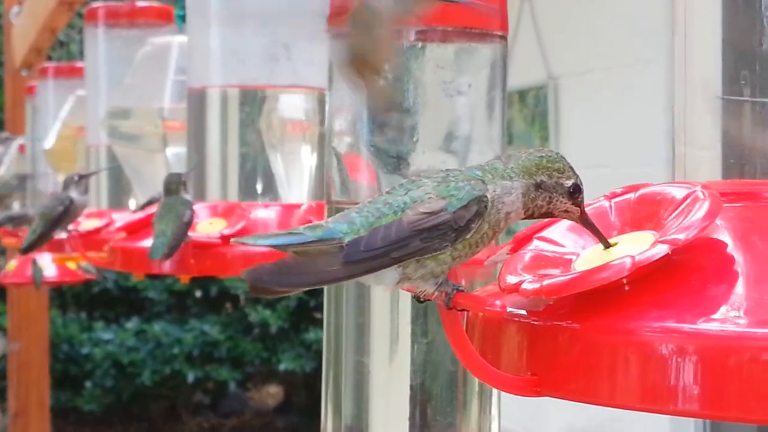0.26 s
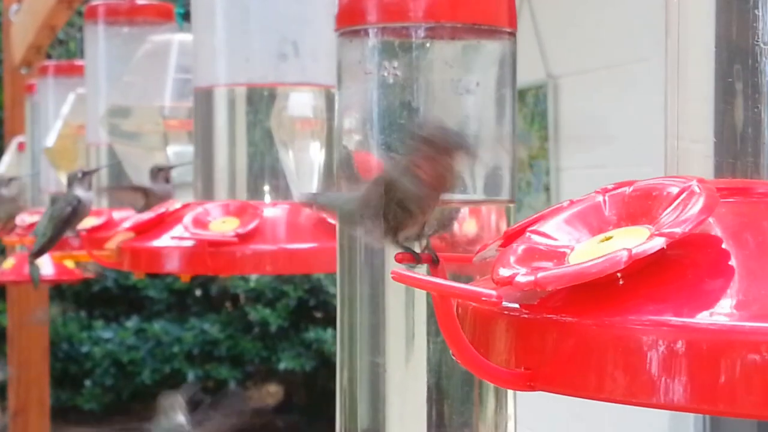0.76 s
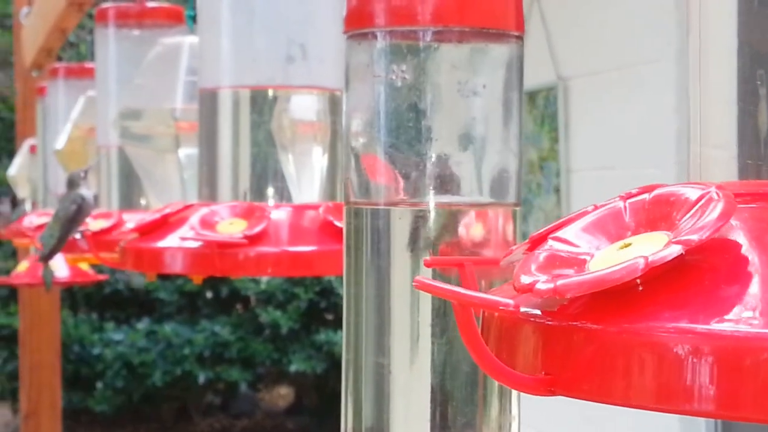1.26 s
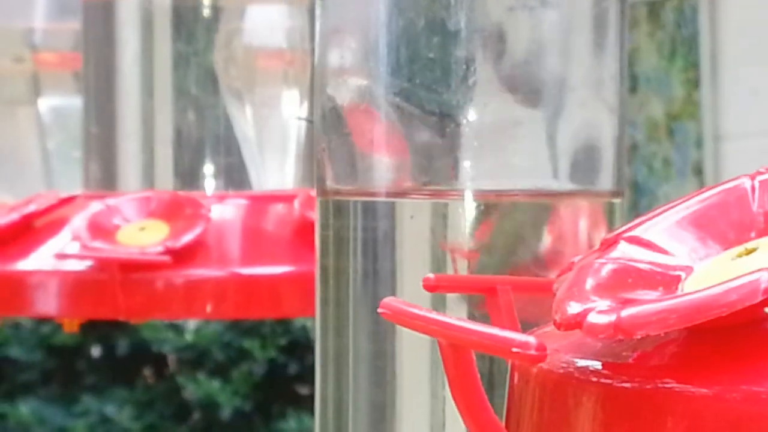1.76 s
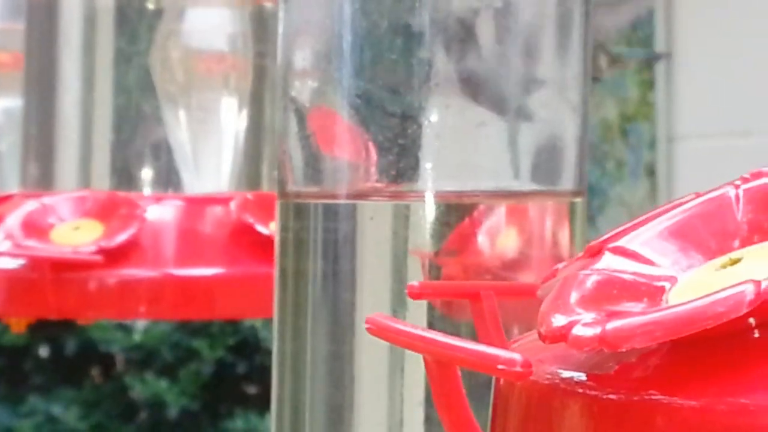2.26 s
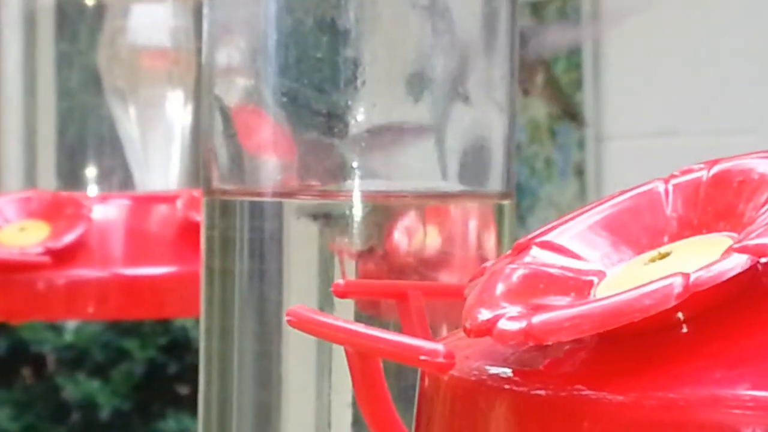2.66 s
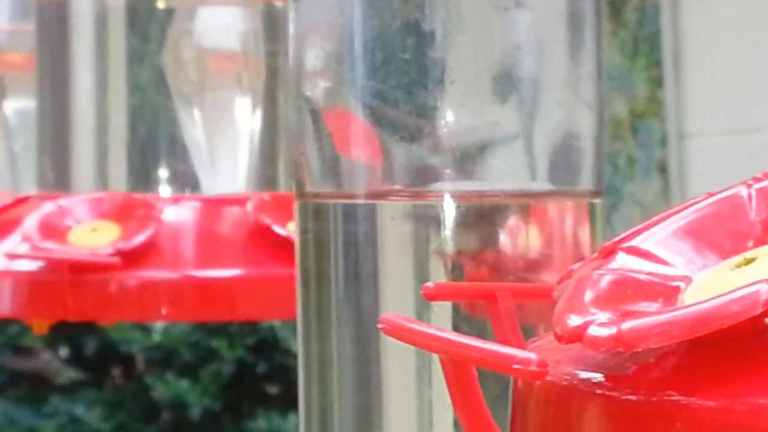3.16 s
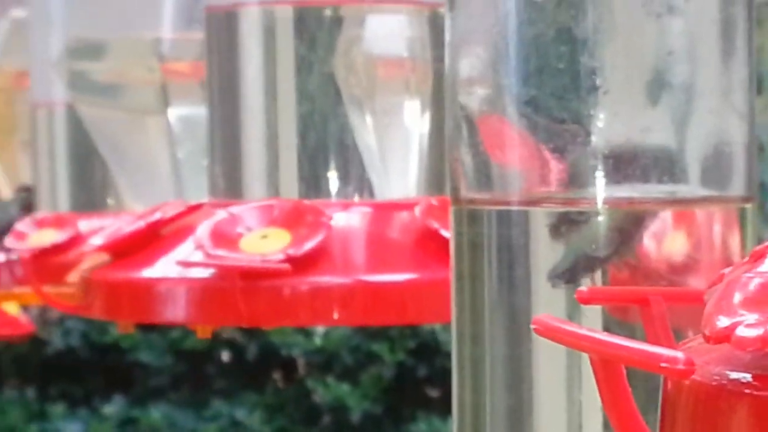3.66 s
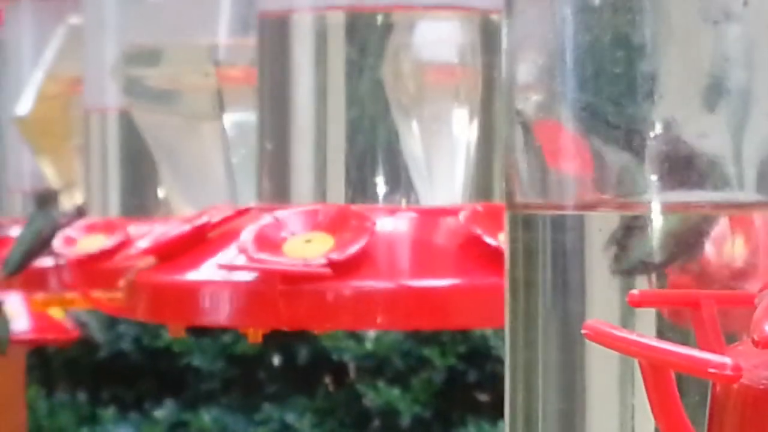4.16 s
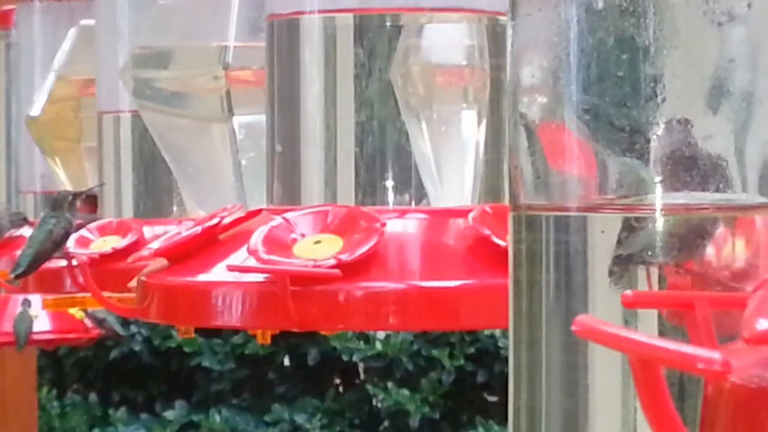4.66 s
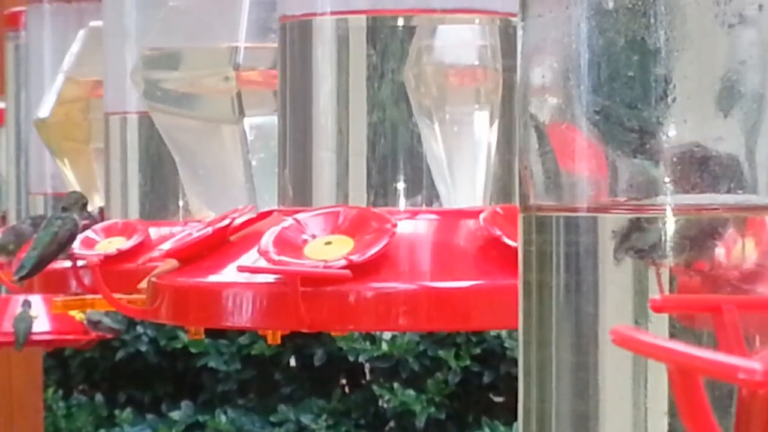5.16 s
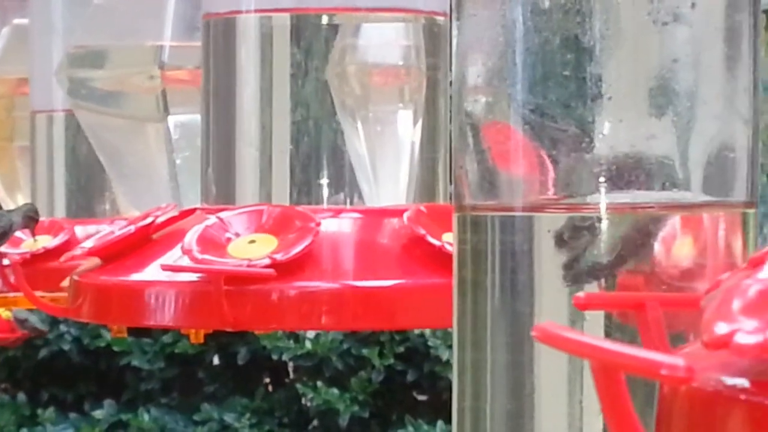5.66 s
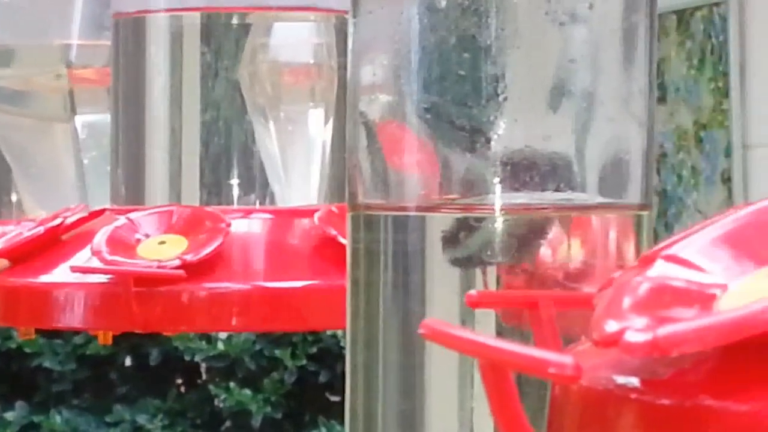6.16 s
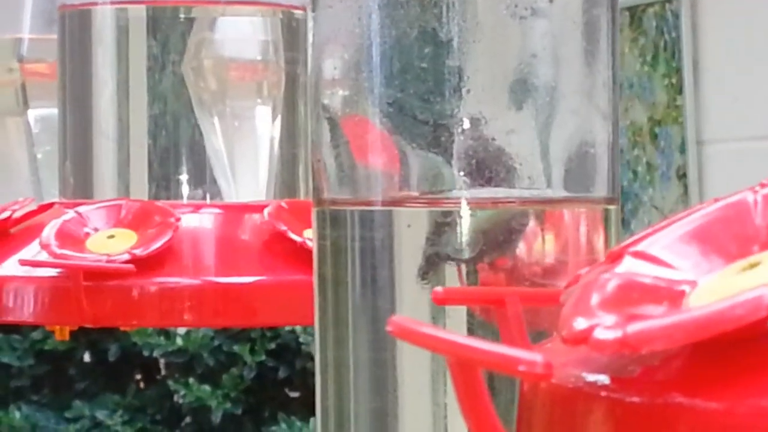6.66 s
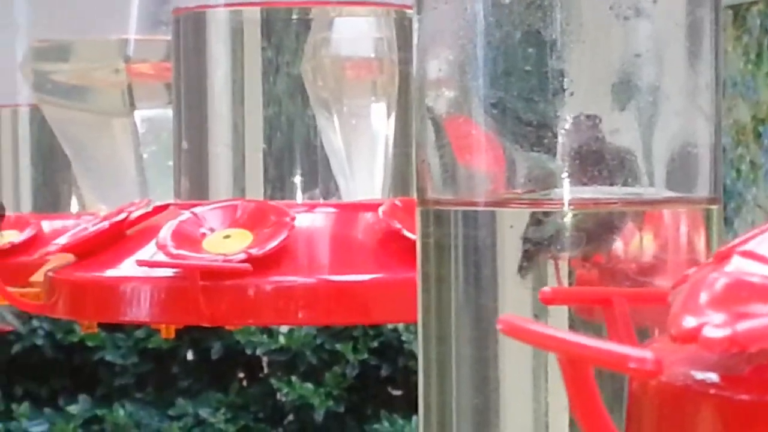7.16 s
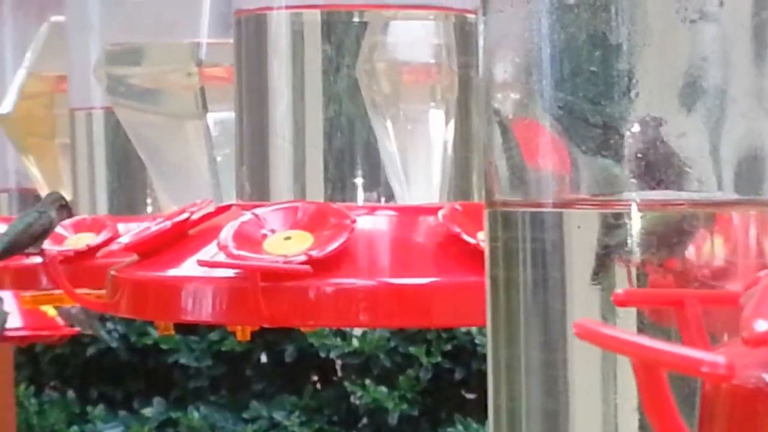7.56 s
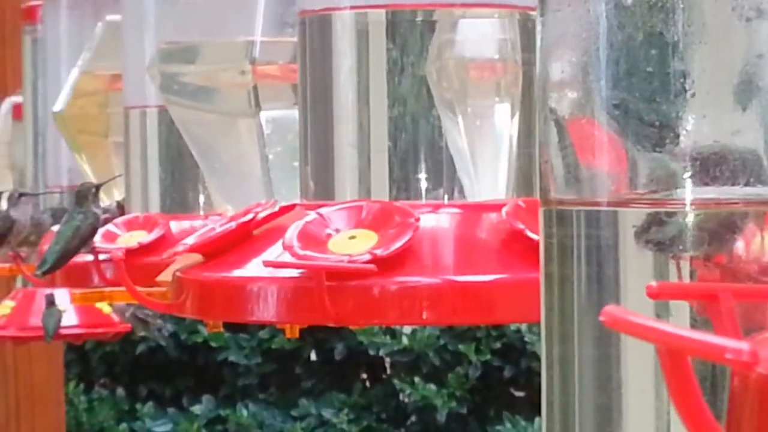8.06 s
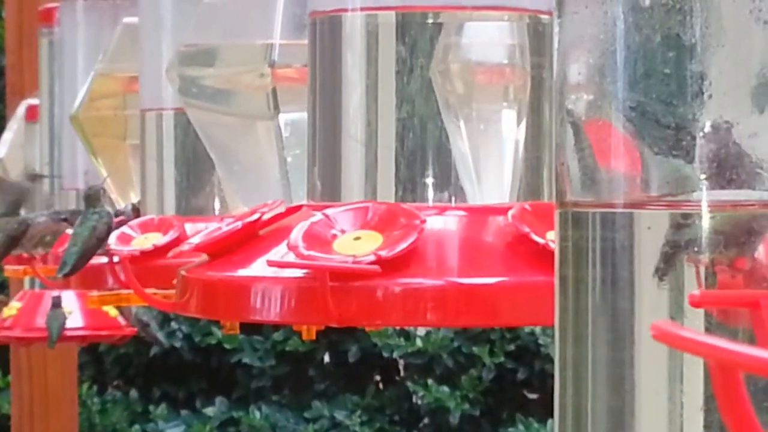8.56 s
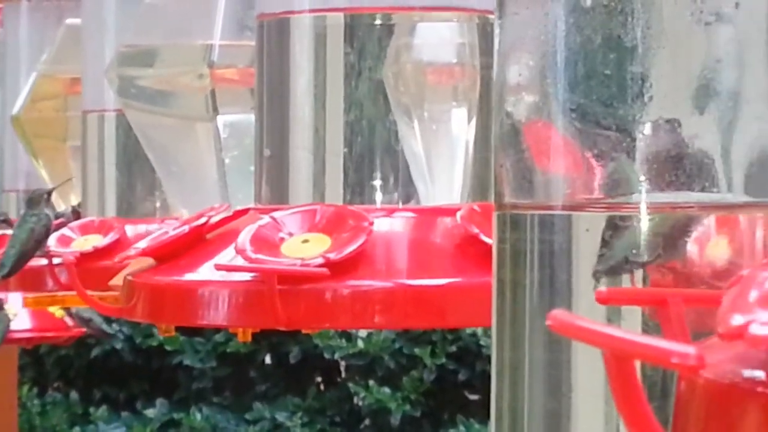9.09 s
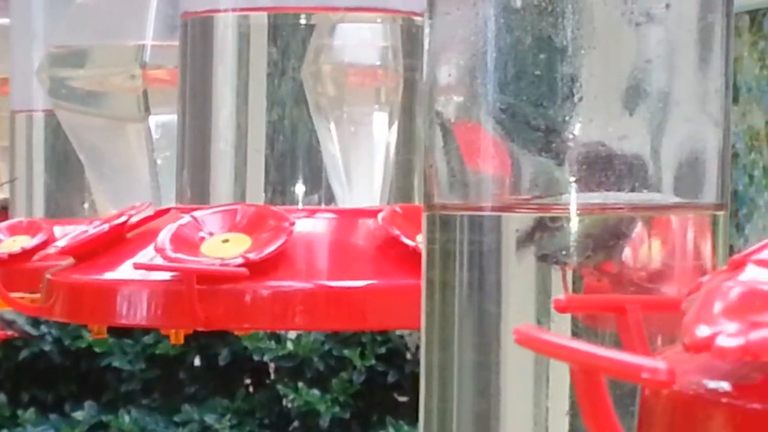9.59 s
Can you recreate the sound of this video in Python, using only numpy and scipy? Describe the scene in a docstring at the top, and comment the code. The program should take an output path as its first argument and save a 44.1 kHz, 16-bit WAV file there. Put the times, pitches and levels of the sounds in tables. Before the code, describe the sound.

Hummingbirds crowd nectar feeders, wings humming loudly at first, with sharp close chips, scolding chatter, thin squeals and late buzzy trills over distant twitter.

```python
"""Hummingbirds at the feeders

Hummingbirds crowd round plastic nectar feeders beside a house wall, close to the microphone.
Wings hum and whirr: shaped pressure pulses plus noise puffs, panned to and fro as the birds dart.
They squabble in falling chips, scolding notes, buzzy trills and thin squeals, made of gliding sines and rasp,
and now and then bump each other or a feeder: a decaying thump and a click of noise.
More birds twitter farther off: flickering noise and random chips, blurred by the yard's echo."""
import sys
import numpy as np
from scipy import signal
from scipy.fft import rfft, irfft, next_fast_len
from scipy.io import wavfile
from scipy.ndimage import map_coordinates

SR = 44100
rng = np.random.default_rng(int(sys.argv[2]) if len(sys.argv) > 2 else 0)


def to_wav(s):
    """Save 16-bit WAV."""
    ch = np.atleast_2d(s).T  # columns
    pcm = np.round(np.clip(ch, -1, 1) * 32767)  # PCM
    wavfile.write(sys.argv[1], SR, pcm.astype(np.int16))


N = 433503

# The deep body of the wing hum. Each row: frequency in Hz, relative level in dB.
HUM = [(25,-36), (44,-7.5), (62,-14.5), (92,-1.5), (190,-2.5), (380,-8.5), (1800,-42.5)]
# The bright hiss of feathers in air. Each row: frequency in Hz, relative level in dB.
SWISH = [(500, -12), (1050, 8.5), (1450, 4), (2200, 9.5), (6000, 2), (14000, -25)]
# The high band of massed calls, also the rasp in a voice. Each row: frequency in Hz, relative level in dB.
TWITTER = [(2500, -20.5), (4300, -5.5), (6200, -3.5), (7500, -1.5), (10000, -13), (14000, -18.5)]


def amp(db):
    """Decibels to gain."""
    return 10 ** (np.asarray(db) / 20)


def unit(x):
    """Scale to rms 1."""
    return x / np.sqrt(np.mean(x ** 2) + 1e-20)


def along(points, hz):
    """Read (Hz, value) points on a log frequency axis."""
    f, v = np.transpose(points)
    return np.interp(np.log(hz + 1), np.log(f), v)


def curve(points):
    """Draw (seconds, value) points as one value per sample."""
    s, value = np.transpose(points)
    return np.interp(np.arange(N) / SR, s, value)


def silence():
    """An empty stereo track."""
    return np.zeros((2, N))


def hiss(size=N):
    """White noise, unrelated left and right."""
    return rng.standard_normal((2, size))


def wobble(rate, size=N):
    """A smooth random curve, rate knots a second."""
    at = np.arange(size) * rate / SR
    knots = rng.standard_normal(int(size * rate / SR) + 4)
    return map_coordinates(knots, [at], order=2)


def phase_of(hz):
    """The running phase of a moving frequency, in radians."""
    return 2 * np.pi * np.cumsum(hz) / SR


def progress(length):
    """0 to 1 over a note of length seconds."""
    return np.linspace(0, 1, max(int(length * SR), 32))


def coloured(x, spectrum):
    """x shaped by a (Hz, dB) spectrum, at rms 1."""
    m = next_fast_len(N + 8192)
    gain = amp(along(spectrum, np.fft.rfftfreq(m, 1 / SR)))
    return unit(irfft(rfft(x, m) * gain, m)[..., :N])


def panned(x, pan_db):
    """Place a sound at constant power; pan_db is left over right, so negative is to the right."""
    g = amp(np.array([pan_db, -pan_db]) / 2).reshape(2, -1)
    return x * g / np.sqrt(np.mean(g ** 2, axis=0))


def add(out, s, x):
    """Mix x into out from time s in seconds."""
    i = int(np.clip(round(s * SR), 0, N - 1))
    out[:, i:i + x.shape[1]] += x[:, :N - i]


def wingbeat(beat_hz, wander, eddies, sharpness=40):
    """Two pressure pulses a beat, down and up, each shedding a puff of eddies; returns hum and stroke force."""
    phase = phase_of(beat_hz * (1 + wander * wobble(7)))
    down = np.abs(np.cos(phase / 2)) ** sharpness
    up = np.abs(np.sin(phase / 2)) ** sharpness
    stroke = down + 0.31 * up + 0.6
    puffs = coloured(stroke * rng.standard_normal(N), HUM)
    pulses = coloured(np.gradient(stroke), HUM)
    return unit(pulses + eddies * puffs), stroke


def wings(count=4, hum_gain_db=2.0, spread_db=6, air_db=-6, swish_db=-6, swish_pan_db=2):
    """Several birds, each at its own beat, dart nearer and farther and from side to side."""
    # The loudness of the wings over time. Each row: time in seconds, level in dB (the hum sits 2 dB over it).
    wing_level = [(0.3, -42), (0.68, -33.5), (1.29, -40), (2.71, -49.5), (4.27, -54), (4.87, -52.5),
                  (5.86, -52.5), (6.27, -60), (6.55, -52), (6.98, -58), (7.66, -56.5), (8.35, -44.5),
                  (8.8, -47.5), (9.1, -44), (9.83, -49)]
    birds, swish = silence(), silence()
    for beat_hz in np.linspace(40, 53, count):
        hum, stroke = wingbeat(beat_hz, wander=.06, eddies=1.488)
        nearness = amp(3.9 * wobble(12))
        birds += panned(hum * nearness, spread_db * wobble(1.957))
        swish += stroke * nearness * hiss()  # feathers hiss on every stroke
    stirred_air = coloured(hiss(), HUM)
    whirr = amp(hum_gain_db) * unit(unit(birds) + amp(air_db) * stirred_air)
    feathers = panned(amp(swish_db) * coloured(swish, SWISH), swish_pan_db)
    return amp(curve(wing_level)) * (whirr + feathers)


def syrinx(hz, overtone_db, count):
    """A tone on a moving pitch; each partial swells as it crosses the voice's resonances."""
    # The voice's resonances. Each row: frequency in Hz, gain in dB.
    voice = [(2050, -8), (2700, -22), (3300, -25), (5200, -4), (6500, -5.5), (7400, 5), (8400, -6),
             (9500, -16.5), (10500, -21), (13000, -16)]
    phase = phase_of(hz)
    tone = 0
    for k in range(1, count + 1):
        gain = amp(along(voice, k * hz) + overtone_db * (k - 2.0))
        audible = k * hz < SR / 2
        tone = tone + gain * audible * np.sin(k * phase)
    return tone


def chip(top_hz, length, end_hz=3100, bend=2.2):
    """One whistle that hangs at the top, then plunges and cracks, at peak 1."""
    u = progress(length)
    crack = .07 * u ** 2 * wobble(3000, len(u))
    hz = (top_hz + (end_hz - top_hz) * u ** bend) * (1 + crack)
    x = syrinx(hz, overtone_db=-7 + 12 * u, count=2)
    x = x * np.minimum(u / 0.19, 1) * np.minimum((1 - u) / 0.063, 1)  # fade in and out
    return x / np.abs(x).max()


def far_birds(count=160, scatter_db=2):
    """Chips at random times, levels, sides and pitches from the other feeders."""
    out = silence()
    times = rng.uniform(0, N / SR, count)
    for s, size, side, pitch in zip(times, *rng.standard_normal((3, count))):
        x = amp(scatter_db * size) * chip(8400 + 600 * pitch, 0.01)
        add(out, s, panned(x, 4 * side))
    return out


def yard(x, near_db=7, near_t60=0.13):
    """The feeders scatter a quick dense echo; wall and hedge add a tail that dies sooner in the treble."""
    # The tail of wall and hedge. Each row: frequency in Hz, time to fall 60 dB in seconds.
    decay_times = [(7000, 0.24), (14000, 0.0052)]
    hz, t, z = signal.stft(hiss(SR // 3), SR, nperseg=256)
    far_tail = amp(-60 * t / np.abs(along(decay_times, hz))[:, None])
    near_scatter = amp(near_db - 60 * t / near_t60)
    decay = (far_tail + near_scatter) * (t > 0)
    tail = signal.istft(z * decay, SR, nperseg=256)[1]
    tail = tail / np.linalg.norm(tail[0])
    return signal.fftconvolve(x.mean(axis=0)[None], tail, axes=1)[:, :N]


def twitter(calls_db=-4, pan_db=-3):
    """Distant calls, mostly echo, blur into a high flickering wash."""
    # The loudness of the distant twitter over time. Each row: time in seconds, level in dB.
    twitter_level = [(0.0, -36), (0.35, -38), (0.9, -36.5), (2.6, -43.5), (3.7, -43.5), (4.11, -50),
                     (4.2, -45), (4.51, -53.5), (4.6, -43), (5.0, -49), (5.3, -43), (6.17, -46),
                     (6.3, -56.5), (6.55, -47), (6.7, -58), (7.58, -50), (7.85, -41.5), (8.53, -48),
                     (9.06, -40), (9.83, -40.5)]
    far = far_birds()
    flutter_db = 2.2 * wobble(20) + 2.6 * wobble(90)
    blur = coloured(hiss(), TWITTER) * amp(flutter_db)
    calls = amp(calls_db) * unit(far / 2 + yard(far))
    return panned((blur + calls) * amp(curve(twitter_level)), pan_db)


def trills(pulse_hz=370, sag=0.14, deepen=0.52, pan_db=-15):
    """A whistle breaks into tiny uneven down-sweeps, forced ones plunging deepest, and ends in a rasping dive."""
    # Buzzy trills. Each row: start in seconds, length in seconds, level in dB, top pitch in Hz.
    buzzes = [(0.047,0.06,-31,8620), (8.832,0.079,-30.5,9700), (8.948,0.028,-30.5,8900),
              (9.025,0.079,-26,9750), (9.135,0.046,-30,8700), (9.21,0.081,-26,9700), (9.345,0.075,-28,9550),
              (9.473,0.081,-31,9450), (9.605,0.073,-26,9550), (9.74,0.067,-26,9450)]
    out = silence()
    for s, length, db, top_hz in buzzes:
        u = progress(length)
        beats = np.cumsum(pulse_hz * amp(3 * wobble(200, len(u)))) / SR
        cycle = beats % 1
        broken = np.clip(6 * u - .7, 0, 1)  # 0 a plain whistle, 1 fully pulsed
        uneven = rng.standard_normal(len(u))[beats.astype(int)]  # one draw a pulse
        force = amp(3.5 * broken * uneven + 4 * u ** 4)
        plunge = deepen * broken * np.tanh(force ** 2 / 2) * cycle ** 1.5
        ragged = .02 * wobble(120, len(u)) + .028 * broken * u * wobble(2500, len(u))
        phase = phase_of(top_hz * (1 - sag * u ** 6 - plunge + ragged))
        pulses = np.abs(np.sin(np.pi * cycle ** .7)) ** (2 * broken) * force * (1 + broken)
        rasp = .17 * u ** 2 * rng.standard_normal(len(u))
        tone = np.sin(phase) + plunge ** 2 * np.sin(2 * phase)
        x = (tone + rasp) * pulses * signal.windows.tukey(len(u), .12)
        add(out, s, panned(amp(db) * unit(x), pan_db))
    return out


def scold(start_hz, hoarseness, rasp, cycles=46, sag=0.35, grit_db=0):
    """A note that holds, then drops through the voice's resonances; hoarse ones are longer and grittier."""
    length = cycles * (1 + hoarseness) / start_hz * amp(rng.normal(0, 1.59))
    u = progress(length)
    hoarse = .07 * hoarseness * wobble(1500, len(u))
    drop = sag * rng.uniform(.75, 1.25) * u ** 2.7
    hz = start_hz * amp(rng.normal(0, .25)) * (1 - drop + hoarse)
    grit = unit(rasp[:len(u)] * np.cos(phase_of(hz) / 2) ** 2)  # rasp pulsing at the pitch
    force = amp(2 * wobble(250, len(u))) * np.sin(np.pi * u ** 1.4)
    tone = unit(syrinx(hz, overtone_db=-0.5, count=5))
    return amp(rng.normal(0, 1)) * unit((tone + amp(grit_db) * hoarseness * grit) * force)


def scolds(pan_db=-9):
    """Runs of chatter from the perches; each run keeps an even pace and nearly one pitch."""
    # Runs of scolding. Each row: first note in seconds, last note in seconds, number of notes,
    # level in dB, starting pitch in Hz, hoarseness from 0 to 1.
    runs = [(0.171, .172, 1, -45, 2195, 0.1), (2.118, 2.117, 1, -32, 3160, 0.5),
            (2.203, 2.657, 8, -34, 3117, 0.22), (3.108, 3.294, 4, -35, 2640, 0.08),
            (3.469, 3.653, 4, -34, 2690, 0.05), (3.734, 4.013, 3, -37, 2680, 0.55),
            (4.158, 4.158, 1, -40.5, 2365, 0.44), (5.895, 6.1, 3, -40, 2190, 0.37),
            (6.52, 6.625, 3, -47, 2180, 0.3), (6.918, 7.022, 2, -46.5, 2150, 0.3),
            (7.403, 7.62, 2, -42, 2310, 0.4), (7.93, 8.024, 2, -33.5, 2664, 0.5),
            (8.108, 8.265, 4, -33, 2790, 0), (8.325, 8.394, 2, -32.5, 2630, 0.16),
            (8.51, 8.51, 1, -54, 2180, .15)]
    out = silence()
    rasp = coloured(rng.standard_normal(N), TWITTER)
    for first, last, notes, db, pitch_hz, hoarseness in runs:
        for s in np.linspace(first, last, int(round(notes))):
            note = scold(pitch_hz, hoarseness, rasp[int(s * SR):])
            add(out, s, panned(amp(db) * note, pan_db))
    return out


def chips(pan_db=-13):
    """The loudest birds snap close by on the right; fainter ones are nearer the middle."""
    # Sharp chips. Each row: time of the loudest part in seconds, level in dB, starting pitch in Hz,
    # length in seconds.
    snaps = [(0.26,-14,8330,0.0071), (0.339,-4.5,9170,0.0083), (0.901,-4.5,7520,0.011),
             (0.928,1,12440,0.0091), (1.025,-5.5,8850,0.0033), (1.259,-2.5,9100,0.0015),
             (1.331,-8.5,9600,0.015), (1.4,-2.5,9280,0.0092), (1.698,-6,9220,0.019),
             (1.803,-3.5,9070,0.0119), (2.811,-4.5,8880,0.012), (2.873,-5.5,9330,0.015),
             (2.973,-6,9040,0.012), (3.39,-4.5,7700,0.01325), (3.926,-4.5,7600,0.011),
             (4.569,-24.5,8400,0.0066), (4.744,-18.5,8370,0.0083), (5.613,-6,8100,0.013),
             (5.869,-20.5,8500,0.007), (6.154,-17,9150,0.0066), (7.09,-20.5,8226,0.014),
             (7.471,-21.5,8100,0.0096), (8.239,-18,8020,.01), (8.363,-17.5,9170,0.00763),
             (8.666,-17.5,8400,0.00503), (8.847,-18.5,9900,0.025), (9.221,-12.5,9400,0.0093),
             (9.492,-9,9450,0.023), (9.524,-11.5,9180,0.015), (9.778,-13,9200,0.0069)]
    out = silence()
    for s, db, top_hz, length in snaps:
        x = chip(top_hz, length)
        loudest = np.average(np.arange(len(x)), weights=x ** 4) / SR
        add(out, s - loudest, panned(amp(db) * x, pan_db - (db + 19)))
    return out


def squeals(overtone_db=-14, rasp_db=4.0, flutter_db=4.0, rise=.2, pan_db=-3):
    """Thin, arching notes; forced harder, they climb and break up into a ragged, fluttering rasp."""
    # Held squeals. Each row: start in seconds, length in seconds, level in dB, central pitch in Hz,
    # roughness from 0 (pure) to a little over 1 (torn).
    cries = [(0.344,0.15,-31.5,4250,1.13), (0.619,0.1383,-29.5,4280,0.92), (0.908,0.1,-29,4310,1.01),
             (1.935,0.12,-33.5,7320,0.54), (2.803,0.24,-40,6510,0.62), (7.689,0.07,-33.5,6120,0.49),
             (7.763,0.12,-36.5,6060,0.45), (8.545,0.078,-37.5,5145,0.24), (8.605,0.13,-39.5,5402,0.8)]
    out = silence()
    rasp = coloured(hiss(), TWITTER)
    for s, length, db, pitch_hz, rough in cries:
        u = progress(length)
        waver = .07 * rough ** 2 * (wobble(130, len(u)) + wobble(1500, len(u)))
        arch = .06 * rough * (np.sin(np.pi * u) - .7)
        climb = rise * rough ** 2 * (u - u.mean())
        phase = phase_of(pitch_hz * (1 + waver + arch + climb))
        tone = unit(np.sin(phase) + amp(overtone_db) * np.sin(2 * phase))
        torn = amp(rasp_db) * rough ** 2 * rasp[:, int(s * SR):][:, :len(u)]
        x = (tone + torn) * amp(flutter_db * rough * wobble(174.5, len(u)))
        add(out, s, panned(amp(db) * unit(x * signal.windows.tukey(len(u), .5)), pan_db))
    return out


def hover(beat_hz=46.7, slap_db=-13, pan_db=-3):
    """The nearest bird's clean hum, strongest at twice the wingbeat, with a soft slap on each downstroke."""
    # One bird hovering right at the microphone. Each row: start in seconds, length in seconds, hum level in dB.
    visits = [(0.523, 0.17, -29.5), (0.735, 0.12, -35), (1.026, 0.19, -32.5)]
    out = silence()
    feathers = coloured(hiss(), SWISH)
    for s, length, db in visits:
        u = progress(length)
        phase = phase_of(np.full_like(u, beat_hz))
        hum = np.sin(2 * phase) + np.sin(4 * phase) / 2
        downstroke = np.maximum(np.sin(phase), 0) ** 2
        slap = unit(downstroke * feathers[:, int(s * SR):][:, :len(u)])
        add(out, s, panned(amp(db) * (hum + amp(slap_db) * slap) * np.sin(np.pi * u), pan_db))
    return out


def bumps(cycles=4, click_t60=0.0098, pan_db=-5):
    """A push of air from a wing, 60 dB down after a few cycles, with a dry click where something is touched."""
    # Wing flicks and bumps. Each row: start in seconds, thump level in dB, thump pitch in Hz,
    # click level in dB before it is halved.
    knocks = [(0.703, -14.5, 152, -53), (1.017, -44.5, 300, -9), (3.9191, -16.5, 404, -5),
              (3.9484, -58, 300, -10), (5.733, -30.5, 130, -43.5)]
    out, t = silence(), np.arange(SR // 10) / SR
    for s, thump_db, hz, click_db in knocks:
        thump = amp(thump_db - 60 * t * hz / cycles) * np.sin(2 * np.pi * hz * t)
        click = amp(click_db - 60 * t / click_t60) * hiss(len(t)) / 2
        add(out, s, thump + panned(click, pan_db))
    return out


def flutter(s=1.19, length=.26, beat_hz=45.5, ring_hz=1020, db=-44):
    """A bird brakes hard: on every downstroke its feathers give a faint breathy note and a swish."""
    out, u = silence(), progress(length)
    stroke = np.cos(phase_of(np.full_like(u, beat_hz)) / 2) ** 4
    note = coloured(hiss(), [(ring_hz * .75, -30), (ring_hz, 0), (ring_hz * 1.3, -30)])
    feathers = (note + coloured(hiss(), SWISH))[:, :len(u)]
    add(out, s, amp(db) * feathers * stroke * np.sin(np.pi * u) ** .5)
    return out


def from_right(x, lag_s=0.0003):
    """Sound from the right reaches the left microphone a little later."""
    t = np.arange(N)
    left = np.interp(t - round(lag_s * SR), t, x[0], left=0)
    return np.array([left, x[1]])


def scene(chip_wet_db=-9, perch_wet_db=-2, trill_wet_db=-6):
    """Near chips arrive almost dry; the birds on the perches carry more of the yard."""
    near = chips() + bumps()
    perched = scolds() + squeals()
    buzz = trills()
    sent = amp(chip_wet_db) * near + amp(perch_wet_db) * perched + amp(trill_wet_db) * buzz
    echo = panned(yard(sent), pan_db=-7.5)
    return from_right(near + perched + buzz) + echo + wings() + hover() + flutter() + twitter()


def record(dry, low_hz=36, top_hz=14700):
    """The deepest rumble is taken out, and the microphone keeps nothing above its band limit."""
    m = next_fast_len(N + 8192)
    hz = np.fft.rfftfreq(m, 1 / SR)
    lean = signal.sosfilt(signal.butter(4, low_hz, "highpass", fs=SR, output="sos"), dry)
    keep = 1 / np.sqrt(1 + (hz / top_hz) ** 120)  # a very steep low-pass
    return np.clip(irfft(rfft(lean, m) * keep, m)[:, :N], -1, 1)


dry = scene()
out = record(dry)
to_wav(out)
```